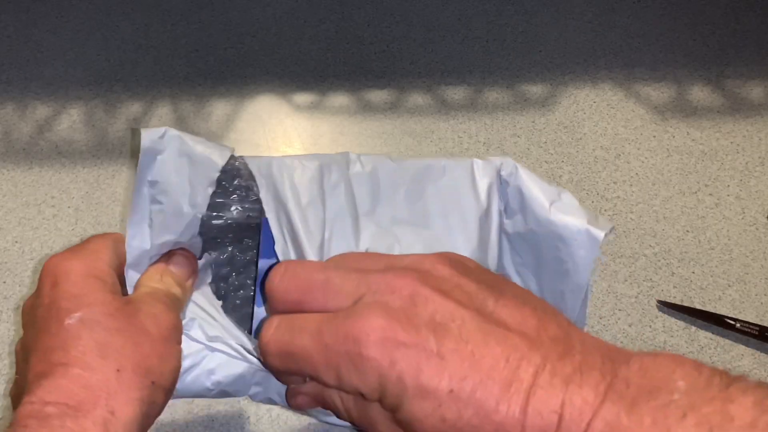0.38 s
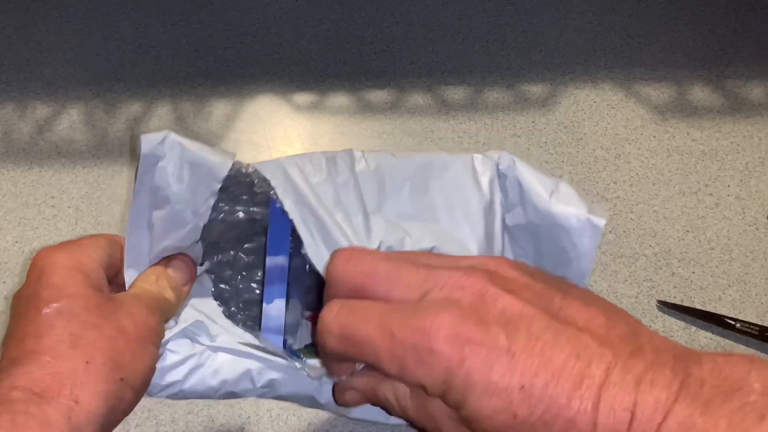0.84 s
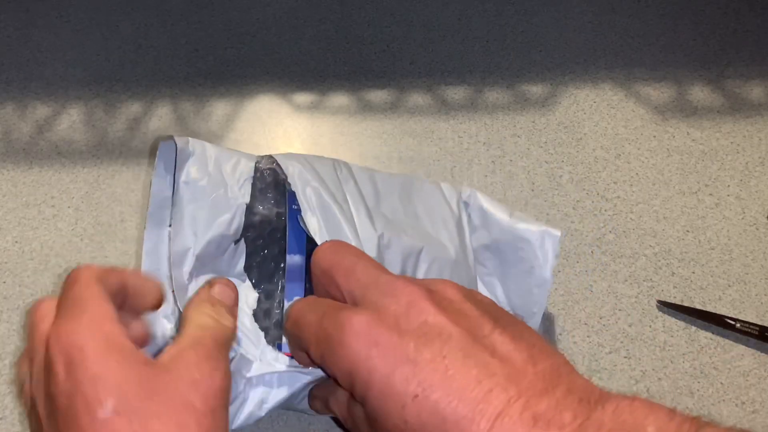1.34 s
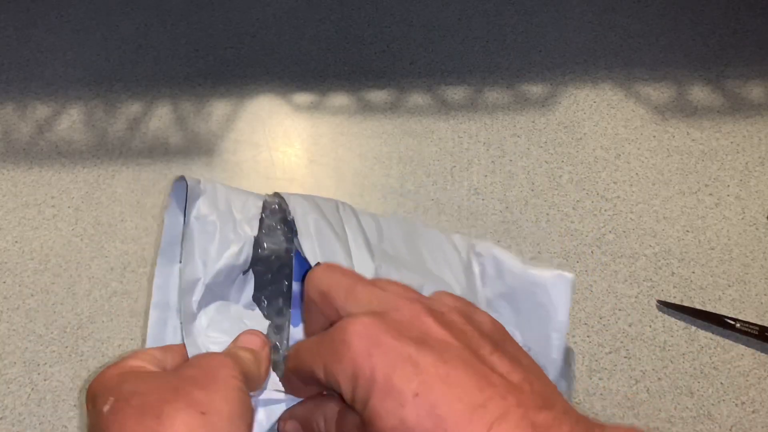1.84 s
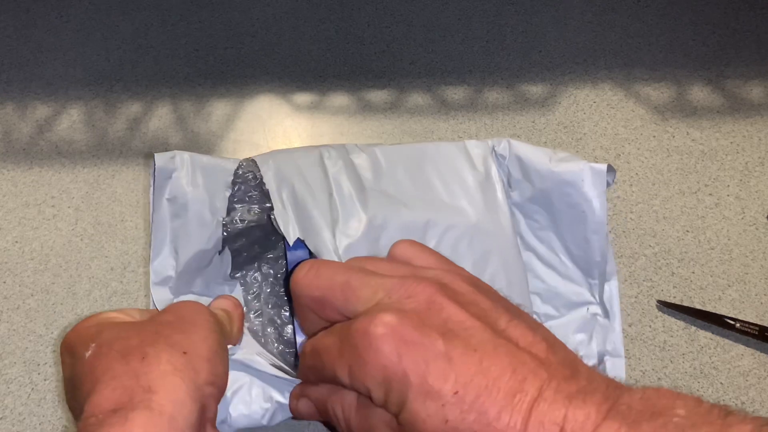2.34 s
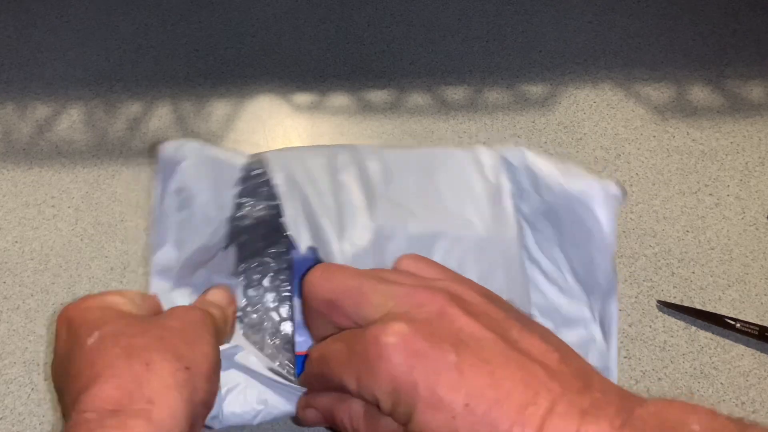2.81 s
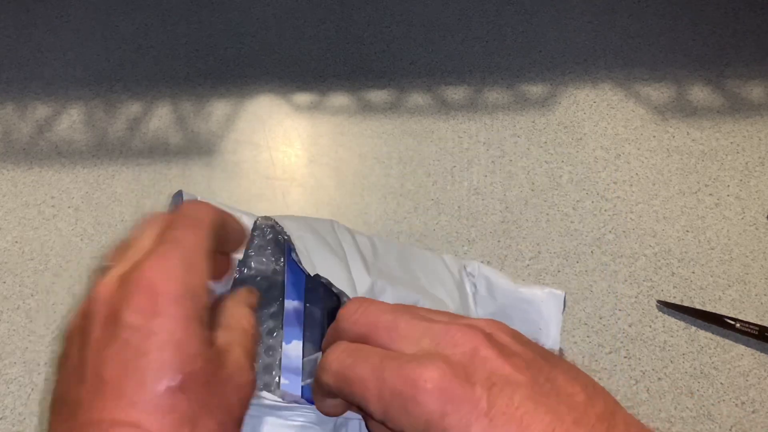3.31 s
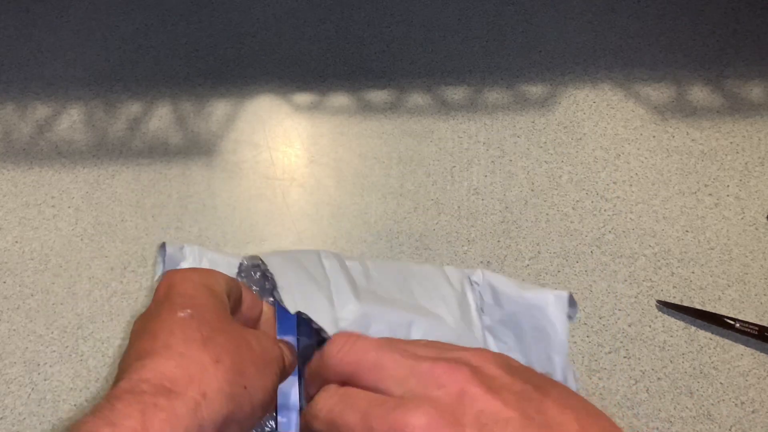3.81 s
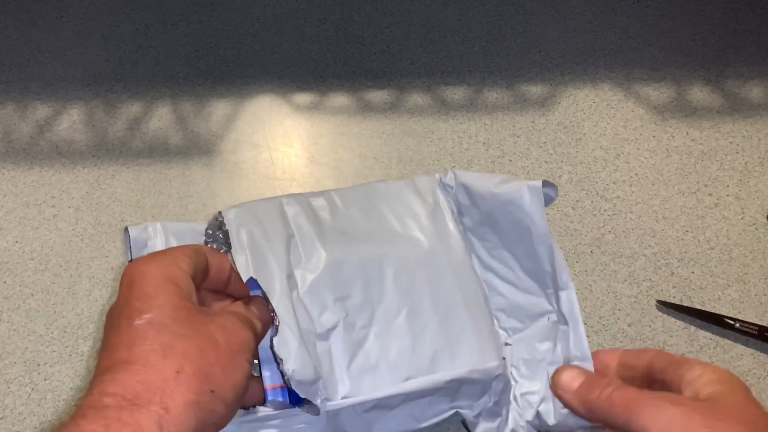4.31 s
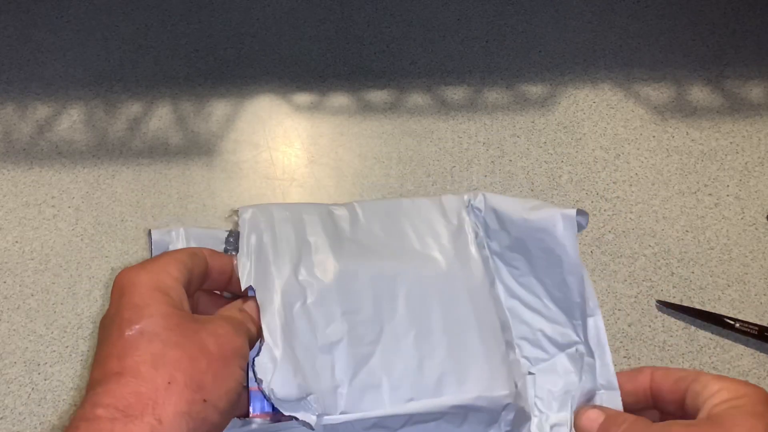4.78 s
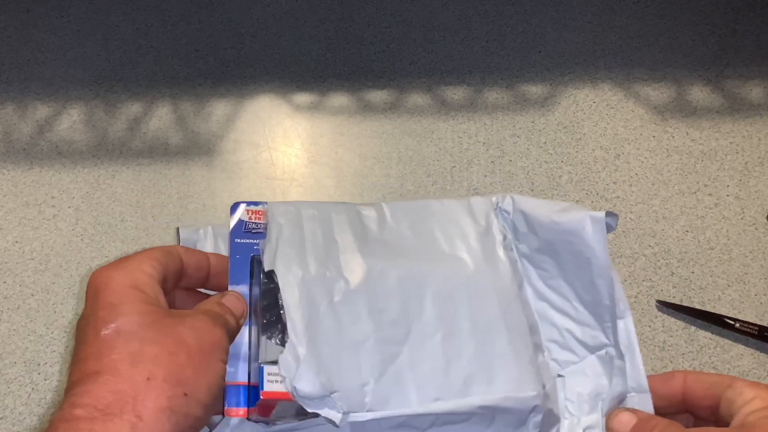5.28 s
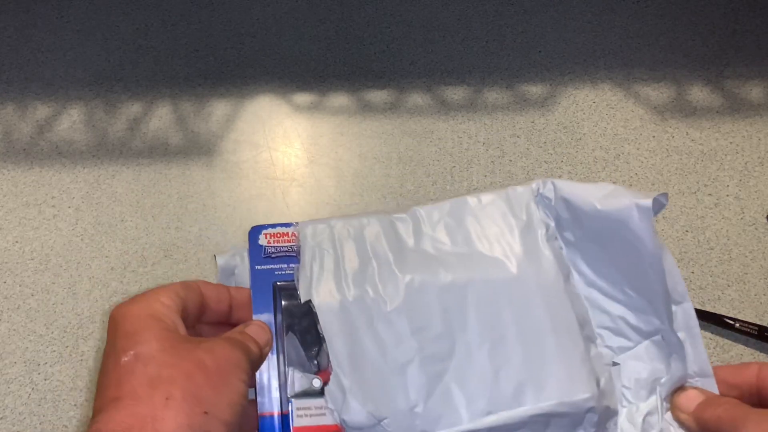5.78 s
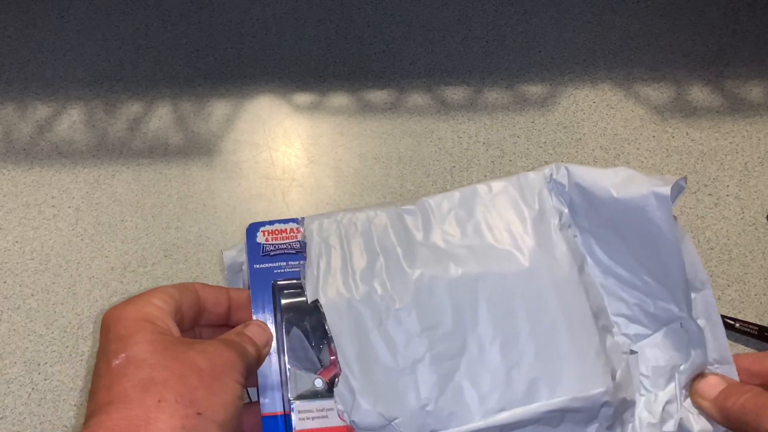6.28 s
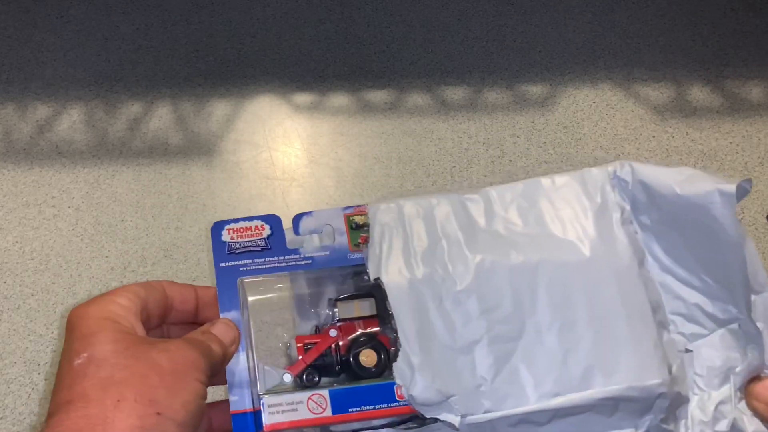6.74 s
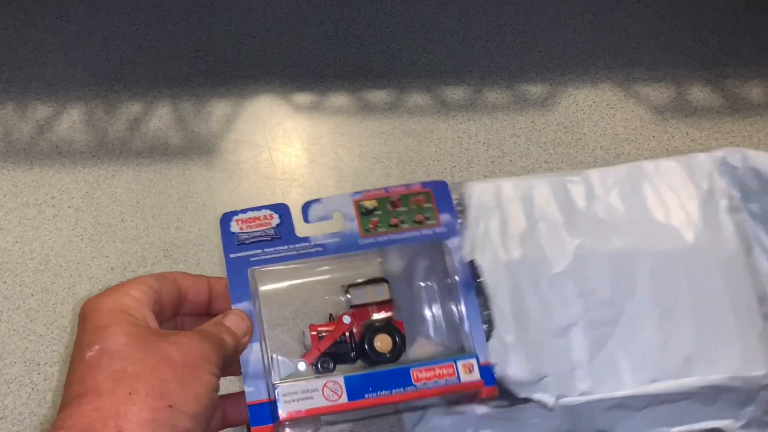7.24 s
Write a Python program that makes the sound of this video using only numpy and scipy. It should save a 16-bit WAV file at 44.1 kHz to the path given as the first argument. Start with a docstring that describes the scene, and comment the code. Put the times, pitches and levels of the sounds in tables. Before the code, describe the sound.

Close stereo microphone in a small quiet room: hands work open a padded plastic mailer on a counter. Bright, dense crackling with sharp snaps and stiff pops comes in quick tugs for about three seconds, loudest just after two. Then low soft bumps as the hands shift, sparser rustles, and near quiet. A short crinkle around six and a half seconds and tiny rustles at the end as a boxed toy slides out.

```python
"""A counter in a small quiet room: close under a two-port microphone, two hands open a padded plastic
mailer and slide a boxed toy out. Creases of film buckle as short noise bursts, over a bed of tiny
ticks and rubbing noise; the air pocket of the bag thumps along as resonant noise and decaying sines.
Moving hands send low bumps and rumble through the counter; stiff folds pop, skin squeaks faintly on
film, sparse echoes answer the parcel and a steady hush lies beneath."""
import sys
import numpy as np
from scipy import signal
from scipy.fft import rfft, irfft, next_fast_len
from scipy.io import wavfile
from scipy.ndimage import uniform_filter1d

SR = 44100
rng = np.random.default_rng(int(sys.argv[2]) if len(sys.argv) > 2 else 0)


def volts(x):
    """Linear amplitude factor 10**(x/20) for a level x in dB, scalar or array-like."""
    e = np.asarray(x, float) / 20
    return 10 ** e


def persist_wave(psi):
    """Save psi, clipped to +-1, as 16-bit WAV."""
    counts = np.round(np.clip(psi, -1, 1) * 32767).astype(np.int16)
    wavfile.write(sys.argv[1], SR, np.atleast_2d(counts).T)


N = 325258  # samples

# pulls and slides of the hands: start_s [s, full effort], hold_s [s], film_db [dB],
# stiff_db [dB, creases above the film], rub_share [0-1, smooth rubbing]
PULLS = [(0.0, 0.013, -39, -3, 0.07), (0.076, 0.073, -46, -35, 0.4), (0.257, 0.015, -37, -7.5, 0.31),
         (0.333, 0.05, -37, -8.5, 0.63), (0.525, 0.056, -39, -8.5, 0.55), (0.669, 0.041, -38, -11, 0.45),
         (0.838, 0.097, -46.5, -8.5, 0.7), (0.97, 0.098, -41, -6, 0.49), (1.21, 0.016, -43, -9, 0.2),
         (1.322, 0.0055, -43.5, -3, 0.68), (1.426, 0.11, -55.5, -1, 0.6), (1.607, 0.23, -44, -7.5, 0.41),
         (1.931, 0.01, -41.5, -6, 0.32), (2.063, 0.12, -40, -6.5, 0.12), (2.261, 0.084, -41.5, -9.5, 0.47),
         (2.412, 0.17, -47, -9.5, 0.3), (2.666, 0.01, -45, -13.5, 0.27), (2.793, 0.21, -46, -7.5, 0.41),
         (3.005, 0.013, -49.5, -0.5, 0.4), (3.117, 0.0036, -42, -3.5, 0.42),
         (3.521, 0.095, -52.5, -4.5, 0.51), (3.893, 0.004, -47, -4, 0.4), (4.538, 0.19, -48.5, -10, 0.23),
         (4.673, 0.1, -50, -5, 0.24), (4.918, 0.081, -54, -1.5, 0.27), (5.052, 0.23, -51, -5.5, 0.45),
         (5.348, 0.15, -56, -3, 0.31), (6.405, 0.06, -44.5, -5.5, 0.74), (6.576, 0.051, -61, -6, 0.8),
         (6.794, 0.042, -67, -7, 0.33), (6.885, 0.067, -62, -3.5, 0.8), (7.013, 0.39, -61, -1.5, 0.5),
         (7.197, 0.044, -51, -11, 0.44)]
# flicks, the film twitches once under a finger: start_s [s], film_db [dB], stiff_db [dB above the film]
FLICKS = [(3.3, -56.5, -28), (3.777, -68.5, 12), (3.836, -44, -2.5), (4.097, -53, -9),
          (4.194, -54.5, -10.5), (4.372, -59, -0.5), (4.47, -54.5, -7), (6.02, -69, -10), (6.141, -70, -10),
          (6.234, -59, -2.5), (6.3, -61, 2), ]
# the air pocket sounds more by the time the bag is open: time_s [s], level_db [dB above the stiff creases]
POCKET_OPENING = [(0, -7), (1.2, -9), (1.6, -2.5), (2.5, -7), (3.0, -1), (4.3, -6), (5.0, 0), (6.5, -1),
                  (7.38, 4)]
# spectrum of thin film: frequency_hz [Hz], gain_db [dB]
FILM_SPECTRUM = [(1500, -20.5), (3000, -7.5), (6000, -5), (8000, -1.5), (11300, -3), (12000, -10),
                 (15600, -6), (16200, -44), (17000, -56.5)]
# spectrum of stiff folds and card: frequency_hz [Hz], gain_db [dB]
CREASE_SPECTRUM = [(500, -7.5), (900, 2), (1400, 5.5), (2100, 4.5), (3000, -4), (5000, -44.5)]
# resonances of the air pocket: frequency_hz [Hz], width_hz [Hz], gain_db [dB]
POCKET_MODES = [(310, 81, -2), (441, 150, 1.5), (615, 26, 1)]
# single snaps of the film, loud and faint: start_s [s], level_db [dB], centre_hz [Hz]
FILM_SNAPS = [(0.035, -22, 11100), (0.1105, -21, 9000), (0.195, -36.5, 11200), (0.2542, -15, 10900),
              (0.269, -23, 9960), (0.3127, -20.5, 7300), (0.3317, -24, 6380), (0.4439, -21, 7000),
              (0.4572, -23.5, 6960), (0.5212, -19.5, 6700), (0.5344, -25, 10500), (0.5621, -26, 6080),
              (0.5906, -16, 4850), (0.6644, -34, 5960), (0.686, -29, 2810), (0.71, -24, 3340),
              (0.7314, -17, 6860), (0.7555, -29.5, 9930), (0.9712, -27, 7100), (1.0294, -26, 2780),
              (1.058, -17, 5970), (1.1488, -30, 11300), (1.3174, -26, 4350), (1.506, -38, 10500),
              (1.5998, -30, 9800), (1.6701, -30, 6650), (1.7315, -21, 9710), (1.7657, -21, 11200),
              (1.8268, -21.5, 9900), (1.945, -29, 9960), (1.952, -25, 11300), (1.965, -26, 10200),
              (2.011, -27.5, 11200), (2.0782, -25.5, 11400), (2.0946, -20, 11100), (2.1231, -23, 7020),
              (2.135, -5, 7460), (2.1454, -15, 6440), (2.1796, -22, 11100), (2.1897, -15.5, 9800),
              (2.215, -22, 11100), (2.2326, -13.5, 4880), (2.2712, -28, 7740), (2.3992, -26.5, 7000),
              (2.448, -27, 5500), (2.4688, -30.5, 10200), (2.4874, -37, 7070), (2.5154, -23.5, 3100),
              (2.559, -32.5, 10600), (2.615, -33, 10900), (2.6768, -21, 10700), (2.751, -19, 10800),
              (2.7703, -26, 10700), (2.8903, -26, 10700), (2.911, -26, 11100), (2.9662, -27, 11300),
              (3.1393, -23.5, 7210), (3.2114, -36.5, 4040), (3.247, -37.5, 6140), (3.2963, -40, 11540),
              (3.4308, -41.5, 3200), (3.5513, -29, 10000), (3.8377, -29.5, 11300), (3.9098, -25.5, 10600),
              (3.9804, -32.5, 11300), (4.0796, -31, 11400), (4.1577, -35.5, 6610), (4.2763, -37, 11000),
              (4.4875, -28, 4800), (4.5072, -31, 10400), (4.558, -25.5, 10200), (4.582, -30, 11000),
              (4.6249, -26.5, 11200), (4.6642, -20, 10200), (4.7108, -25, 7550), (4.9178, -33.5, 3070),
              (5.019, -32, 11100), (5.037, -30, 10400), (5.0844, -37, 10500), (5.1796, -29.5, 11200),
              (5.2852, -30, 4130), (5.5747, -29.5, 4340), (5.5916, -38, 4560), (5.635, -33.5, 4270),
              (5.8645, -52.5, 4120), (6.008, -46.5, 3700), (6.0477, -46, 4450), (6.134, -42, 5740),
              (6.2104, -38, 9700), (6.32, -44, 3000), (6.3675, -21.5, 3600), (7.0439, -40.5, 4890),
              (7.3192, -36, 4270), (7.3664, -27, 3080)]
# pops of stiff folds and card: start_s [s], level_db [dB], pitch_hz [Hz]
FOLD_POPS = [(0.028, -48, 1260), (0.092, -28, 1480), (0.202, -36, 1690), (0.22, -30.5, 1510),
             (0.27, -21.5, 1240), (0.333, -30, 1060), (0.458, -33, 1030), (0.493, -22.5, 1790),
             (0.535, -28.5, 2000), (0.546, -30, 1490), (0.664, -33, 1130), (0.687, -30, 2010),
             (0.732, -27.5, 2040), (0.764, -36, 1420), (0.966, -34.5, 1340), (0.982, -33, 1710),
             (1.022, -34, 1290), (1.057, -29, 1360), (1.318, -29.5, 1320), (1.657, -30.5, 1600),
             (1.808, -34.5, 1300), (1.827, -33, 2540), (2.079, -35, 2030), (2.124, -28.5, 1300),
             (2.136, -29, 2000), (2.19, -32, 1920), (2.232, -20, 1760), (2.272, -29.5, 2000),
             (2.289, -25.5, 910), (2.402, -32, 1840), (2.447, -29.5, 1330), (2.516, -35, 1960),
             (2.559, -36, 1040), (2.678, -34, 2260), (2.772, -30, 2160), (2.783, -36.5, 1150),
             (3.077, -37, 1730), (3.137, -33, 2230), (3.213, -47, 1780), (3.552, -40.5, 1600),
             (4.459, -42, 2080), (4.542, -38.5, 2330), (4.618, -35, 1280), (4.676, -34.5, 1540),
             (4.935, -35.5, 1340), (4.999, -38, 1280), (5.155, -38, 1480), (5.256, -35, 1570),
             (5.369, -36.5, 1690), (5.575, -35, 1250), (6.135, -52, 910), (6.211, -36, 1730),
             (6.354, -40.5, 1620), (6.368, -36.5, 1030), (7.044, -41, 890), (7.196, -37.5, 2000)]
# knocks of the air pocket and the box: start_s [s], level_db [dB], pitch_hz [Hz]
BAG_KNOCKS = [(0.268, -37, 484), (0.359, -44, 310), (0.492, -34, 407), (0.935, -41.5, 310),
              (0.982, -37.5, 438), (1.052, -36.5, 310), (1.201, -41.5, 315), (1.347, -43, 368),
              (2.104, -38.5, 218), (2.342, -42.5, 430), (2.405, -41, 400), (2.616, -38, 410),
              (2.92, -40.5, 214), (3.075, -43, 453), (4.617, -44, 466), (4.832, -39, 407),
              (5.574, -36.5, 493), (6.21, -47, 507), (6.282, -39, 342), (6.353, -38, 427),
              (7.043, -39.5, 557), (7.198, -36, 294)]
# faint squeaks of skin on film: start_s [s], length_s [s], level_db [dB], start_hz [Hz], end_hz [Hz]
SKIN_SQUEAKS = [(3.285, .12, -70, 1920, 1820), (3.27, .11, -73, 2650, 2500)]
# low bumps through the counter: start_s [s], level_db [dB], pitch_hz [Hz]
COUNTER_BUMPS = [(2.521, -47, 105), (2.929, -47.5, 118), (3.165, -40, 103), (3.203, -37, 65.6),
                 (3.247, -40, 73), (3.323, -38, 57), (3.387, -47, 46.5), (3.437, -48, 68), (3.649, -49, 50),
                 (3.684, -42, 72.4), (3.749, -49, 57.6), (3.821, -46, 135.3), (6.4, -48, 113),
                 (6.43, -59, 45), (7.19, -43, 151), (7.249, -51, 72.5)]
# weight of the hands on the counter: time_s [s], rumble_db [dB]
HAND_WEIGHT = [(0.0, -88), (1.11, -66.5), (1.27, -76), (2.01, -67), (2.53, -98), (2.81, -67), (3.14, -57.5),
               (3.82, -63), (4.0, -66.5), (4.46, -78), (5.22, -72), (6.92, -77.5), (7.38, -55.5)]
# spectrum of the counter rumble: frequency_hz [Hz], gain_db [dB]
RUMBLE_SPECTRUM = [(20, -23.5), (40, -7), (65, 4), (105, -8), (180, -7.5), (260, -10.5), (400, -29)]
# spectrum of the quiet background: frequency_hz [Hz], gain_db [dB]
HUSH_SPECTRUM = [(24, -18), (40, 11.5), (2390, -17), (2920, -15.5), (6300, -26), (8690, -46.5),
                 (10900, -38.5), (15000, -56.5)]
# likeness of noise at the two ports: frequency_hz [Hz], correlation [0-1]
PORT_LIKENESS = [(60, .85), (350, .97), (900, .75), (1500, .85), (3000, .35), (6000, .4), (8000, .7),
                 (16000, .7)]
# phase by which the left port leads; in the treble it sets sum against difference:
# frequency_hz [Hz], phase_rad [rad]
PORT_LEAD = [(0, 0), (2000, .5), (3600, 3.1), (5600, 3.6), (6500, 5.7), (16300, -6.87)]
# balance of the ports: frequency_hz [Hz], left_minus_right_db [dB]
PORT_BALANCE = [(1500, 0.5), (4200, -4.5), (8000, 2)]


def read(points, hz):
    """Interpolation: the value of a spectrum table on a log-frequency axis."""
    f, value = np.transpose(points)
    return np.interp(np.log(hz + 1), np.log(f + 1), value)


def curve(points, x):
    """Linear interpolation: the value of a table at times or frequencies x."""
    return np.interp(x, *np.transpose(points))


def evened(x):
    """Power normalisation: scales to rms 1."""
    return x / np.sqrt(np.mean(x ** 2) + 1e-20)


def pair(size, gain):
    """Partial coherence: coloured noise at two ports, correlated differently at each frequency."""
    hz = np.fft.rfftfreq(size, 1 / SR)
    left, other = rfft(rng.standard_normal((2, size)))
    same = np.clip(read(PORT_LIKENESS, hz), 0, 1)
    right = same * left + np.sqrt(1 - same ** 2) * other
    return evened(irfft(gain(hz) * np.array([left, right]), size))


def burst(gain, rise_s, t60_s):
    """Transient buckling: one crease gives a noise burst of fast onset and exponential decay, peak 1."""
    t = np.arange(2048) / SR
    envelope = (1 - np.exp(-t / rise_s)) ** 2 * volts(-60 * t / t60_s)
    sound = pair(2048, gain) * envelope
    return sound / abs(sound).max()


def patch(hz, centre_hz, octaves):
    """Local resonance: each patch of film favours its own range of pitch, over a broad skirt."""
    return 0.06 + np.exp(-.5 * (np.log2((hz + 1) / centre_hz) / octaves) ** 2)


def film(hz):
    """Broadband radiation: the spectrum of cracking thin film."""
    return volts(read(FILM_SPECTRUM, hz))


def sliding(hz):
    """Spectral tilt: film that slides is duller than film that cracks."""
    return film(hz) / (1 + (hz / 7000) ** 1.15)


def crease(hz):
    """Bending stiffness: stiff folds and the card of the box sound lower than film."""
    return volts(read(CREASE_SPECTRUM, hz))


def pocket(hz):
    """Cavity resonance: air shut in the bag answers at a few modes."""
    return sum(volts(db) / (1 + (2 * (hz - f) / width_hz) ** 2) for f, width_hz, db in POCKET_MODES)


def move(t, start_s, hold_s, level_db, rise_db_per_s, fall_db_per_s):
    """Exponential growth and decay: the power of one movement rises, holds and falls at steady rates."""
    rise_db = rise_db_per_s * np.maximum(start_s - t, 0)
    fall_db = fall_db_per_s * np.maximum(t - start_s - hold_s, 0)
    return volts(level_db - rise_db - fall_db) ** 2


def effort(t):
    """Power addition: all movements sum to film dB, crease dB and share of rubbing."""
    moves = [(volts(-82) ** 2, -10.5, .25)]  # the film settles by itself
    for s, hold_s, db, stiff_db, rub_share in PULLS:
        moves.append((move(t, s, abs(hold_s), db, 239.5, 145.5), stiff_db, rub_share))
    for s, db, stiff_db in FLICKS:
        moves.append((move(t, s, 0, db, 379, 267), stiff_db, 0.092))
    thin = sum(power for power, _, _ in moves)
    stiff = sum(power * volts(stiff_db) ** 2 for power, stiff_db, _ in moves)
    rub = sum(power * share for power, _, share in moves) / thin
    return 10 * np.log10(thin), 10 * np.log10(stiff), np.clip(rub, 0, 1)


def crackle(clumps, colour, lo_hz, hi_hz, per_s, spread_db, rise_s, t60_s, count):
    """Random point process: creases give way more often inside clumps, and a few are large."""
    out = np.zeros((2, N))
    for centre_hz in np.geomspace(lo_hz, hi_hz, count):
        grain = burst(lambda hz: colour(hz) * patch(hz, centre_hz, 0.45), rise_s, t60_s)
        when = rng.random(N)
        size = np.minimum(rng.exponential(1, N), 3.3)
        train = (when < clumps * per_s / count / SR) * volts(spread_db * size)
        out += signal.oaconvolve(train[None], grain, axes=1)[:, :N]
    return evened(out)


def handling():
    """Friction and buckling: ticks and rubbing in film, folds and air pocket follow the hands."""
    t = np.arange(N) / SR
    film_db, crease_db, rub = (np.interp(t, t[::64], c) for c in effort(t[::64]))
    levels_db = [film_db, crease_db, crease_db + curve(POCKET_OPENING, t)]
    # folds give way in random clumps
    clumps = volts(5.7 * evened(uniform_filter1d(rng.standard_normal(N), 700)))
    clumps /= clumps.mean()
    ticks = [crackle(clumps, film, 3000, 12000, 520, 4.6, 0.0007, 0.004, count=32),
             crackle(clumps, crease, 870, 2800, 260, 5.1, 0.00036, 0.0078, count=16),
             crackle(clumps, pocket, 280, 620, 110, 4.4, 0.0019, 0.019, count=4)]
    size = next_fast_len(N)
    rubs = [pair(size, colour)[:, :N] for colour in (sliding, crease, pocket)]
    # rubbing stutters with the clumps and leaves short gaps
    grip = 0.11 + 1.37 * np.minimum(clumps, 3)
    tick_gain = np.sqrt(1 - rub)
    rub_gain = np.sqrt(rub * grip ** (1 - rub))
    bag = np.zeros((2, N))
    for level_db, tick, rubbing in zip(levels_db, ticks, rubs):
        bag += volts(level_db) * (tick_gain * tick + rub_gain * rubbing)
    return bag


def snaps():
    """Snap-through buckling: film creaks up, cracks around its own pitch and fizzes out."""
    out = np.zeros((2, N + 2048))
    hz = np.fft.rfftfreq(2048, 1 / SR)
    for s, level_db, centre_hz in FILM_SNAPS:
        def colour(hz):
            return film(hz) * (0.21 + patch(hz, centre_hz, 0.42))  # a crack is broad
        creak = volts(-24) * burst(colour, 0.00012, 0.0087)[:, ::-1]  # reversed, it swells into the crack
        fizz = volts(-18.0) * burst(colour, 0.00044, 0.027)
        crack = burst(colour, 0.0014, 0.0063) + fizz
        # the instant of the break reaches down to the mids
        broad = np.maximum(colour(hz), volts(-11) * (hz > 1200) * (hz < 7500))
        spike = np.roll(irfft(broad), 48) * (np.arange(2048) < 512)
        crack += 1.1 * spike / spike.max()
        at = round(s * SR)
        out[:, at:at + 2048] += volts(level_db) * crack
        before = out[:, :at][:, -2048:]
        before += volts(level_db) * creak[:, -before.shape[1]:]
    return out[:, :N]


def pops():
    """Release of bending stress: each stiff fold or piece of card pops around its own note."""
    out = np.zeros((2, N + 2048))
    for s, level_db, pitch_hz in FOLD_POPS:
        pop = burst(lambda hz: crease(hz) * patch(hz, pitch_hz, 0.49), 0.00087, 0.013)
        out[:, round(s * SR):][:, :2048] += volts(level_db) * pop
    return out[:, :N]


def rings(table, rise_turns, t60_turns, sag_turns, skew_rad):
    """Damped oscillation: each blow rings briefly, sagging in pitch, a little out of step at the ports."""
    t = np.arange(SR // 4) / SR
    out = np.zeros((2, N + len(t)))
    leads = skew_rad * rng.standard_normal(len(table))
    for (s, level_db, pitch_hz), lead in zip(table, leads):
        turns = pitch_hz * t  # time in cycles of the settled pitch
        bent = turns + sag_turns * (1 - np.exp(-turns))
        ring = np.sin(2 * np.pi * bent + lead * np.array([[1], [-1]]))
        ring *= (1 - np.exp(-turns / rise_turns)) ** 2 * volts(-60 * turns / t60_turns)
        at = round(s * SR)
        out[:, at:at + len(t)] += volts(level_db) * ring / abs(ring).max()
    return out[:, :N]


def knocks():
    """Impulse excitation: the air pocket and the box ring when knocked."""
    return rings(BAG_KNOCKS, rise_turns=0.34, t60_turns=10.7, sag_turns=0.29, skew_rad=0.083)


def squeaks():
    """Frictional oscillation: a wavering thin tone swells and fades while its pitch slides down."""
    out = np.zeros(N)
    for s, length_s, level_db, start_hz, end_hz in SKIN_SQUEAKS:
        u = np.arange(round(length_s * SR)) / (length_s * SR)
        waver = evened(uniform_filter1d(rng.standard_normal(len(u)), 300))
        hz = (start_hz + (end_hz - start_hz) * u) * (1 + 0.014 * waver)
        tone = np.sin(2 * np.pi * np.cumsum(hz) / SR)
        out[round(s * SR):][:len(u)] += volts(level_db) * np.sin(np.pi * u) * tone
    return out


def bumps():
    """Structure-borne impact: moving hands make the counter ring low for a few cycles."""
    return rings(COUNTER_BUMPS, rise_turns=0.43, t60_turns=7.4, sag_turns=0.24, skew_rad=0.28)


def rumble():
    """Structure-borne noise: low noise in the counter follows the weight of the hands."""
    noise = pair(next_fast_len(N), lambda hz: volts(read(RUMBLE_SPECTRUM, hz) - 60 * (hz > 600)))
    return volts(curve(HAND_WEIGHT, np.arange(N) / SR)) * noise[:, :N]


def room(x):
    """Reverberation: counter and walls return sparse decaying taps of random sign, other ones at each port."""
    t60_s, taps_per_s = .16, 2000
    t = np.arange(SR // 2) / SR
    taps = np.sign(rng.standard_normal((2, len(t)))) * (rng.random((2, len(t))) < taps_per_s / SR)
    taps *= volts(-60 * t / t60_s) * (t > .002)
    dull = signal.lfilter([.6], [1, -.4], taps)  # walls swallow treble
    # long waves reach both ports alike
    dull[1] = dull[0] + signal.lfilter([1, -1], [1, -.94], dull[1] - dull[0])
    return signal.oaconvolve(x, dull / np.linalg.norm(dull[0]), axes=1)[:, :N]


def hush():
    """Stationary noise: the quiet air is a steady coloured noise."""
    noise = pair(next_fast_len(N), lambda hz: volts(read(HUSH_SPECTRUM, hz)))
    return volts(-77.5) * noise[:, :N]


def scene():
    """Superposition: the parcel with its rumble, their echoes, the bumps and the quiet air add up."""
    parcel = handling() + snaps() + pops() + squeaks() + knocks() + rumble()
    return parcel + volts(-12) * room(parcel) + bumps() + hush()


def band_limit(x):
    """A steep low-pass at the top of the band."""
    return signal.sosfilt(signal.butter(12, 16980, fs=SR, output="sos"), x)


def record(dry):
    """Phase difference: spaced ports shift left against right; the treble feeds sum and difference by turns."""
    size = next_fast_len(N + 2048)
    hz = np.fft.rfftfreq(size, 1 / SR)
    half = .5 * curve(PORT_LEAD, hz)
    left, right = rfft(dry, size)
    spaced = np.array([left * np.exp(1j * half), right * np.exp(-1j * half)])
    # the exponent slightly favours the stronger of sum and difference
    c, s = (turn * abs(turn) ** 0.022 for turn in (np.cos(half), np.sin(half)))
    mid = left * c / np.hypot(c, s)
    side = 1j * right * s / np.hypot(c, s)
    treble = np.clip((hz - 6000) / 1500, 0, 1)
    ports = (1 - treble) * spaced + treble * np.array([mid + side, mid - side])
    ports *= volts(read(PORT_BALANCE, hz) * np.array([[.5], [-.5]]))
    ports *= hz ** 2 / (hz ** 2 + 35 ** 2)  # the microphone drops the deepest bass
    mix = irfft(ports, size)[:, :N]
    return band_limit(mix)


dry = scene()
out = record(dry)
persist_wave(out)
```